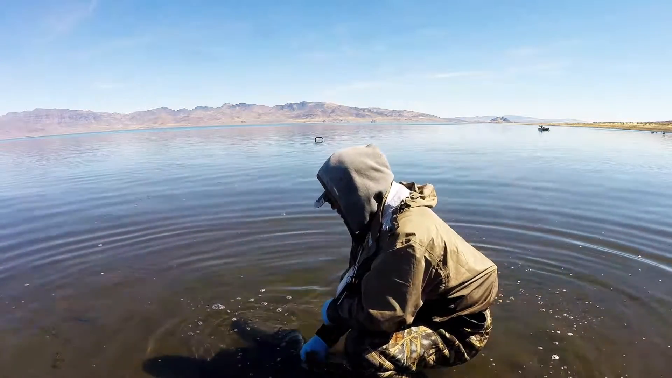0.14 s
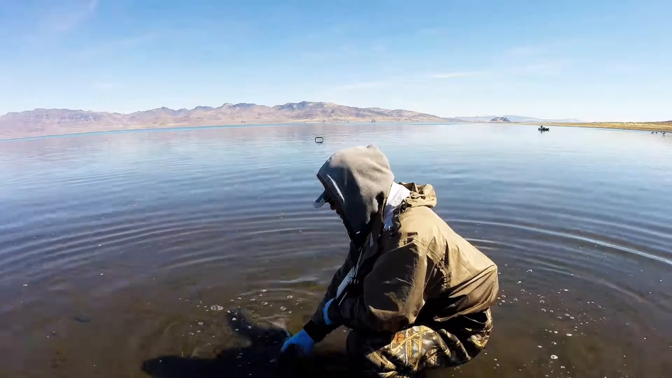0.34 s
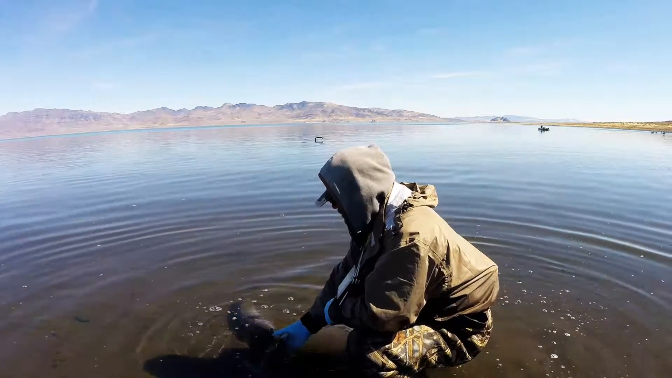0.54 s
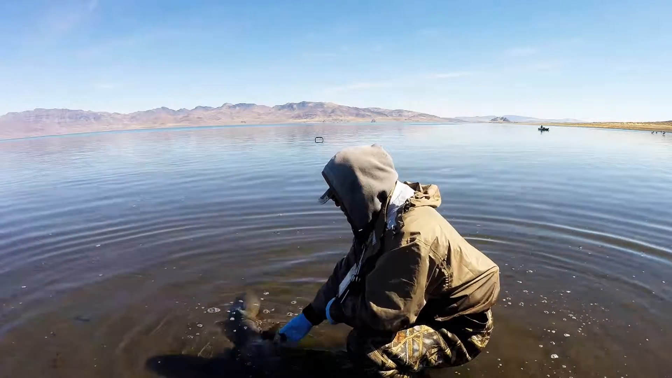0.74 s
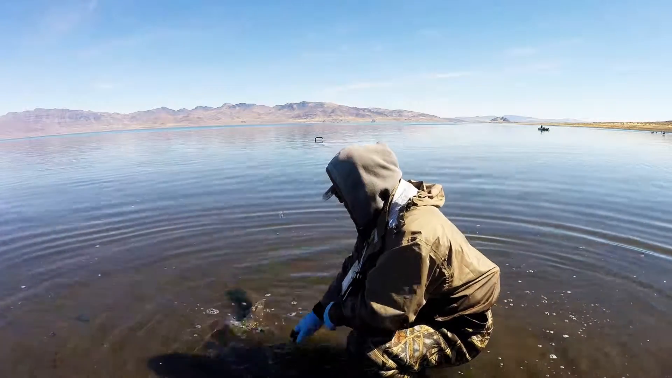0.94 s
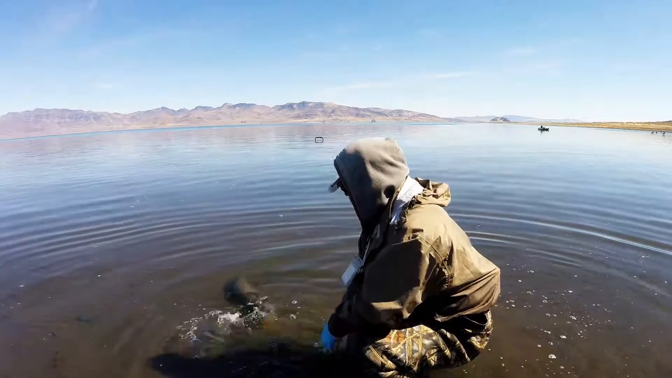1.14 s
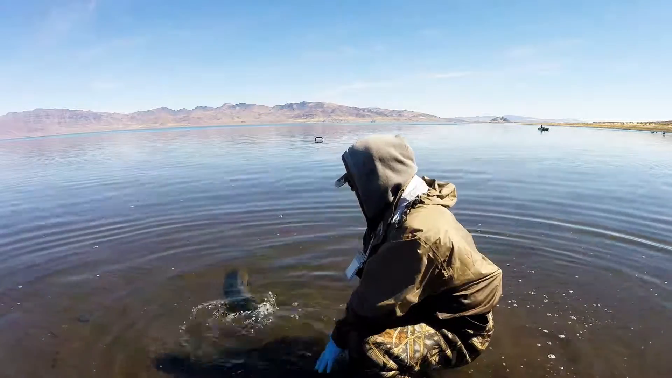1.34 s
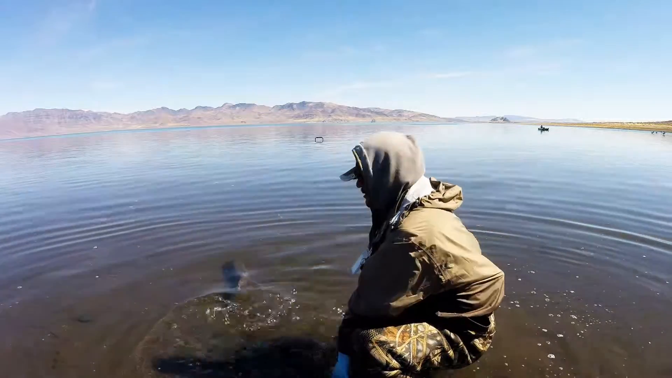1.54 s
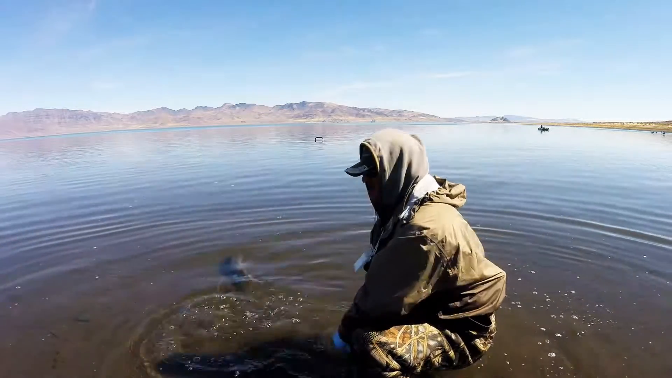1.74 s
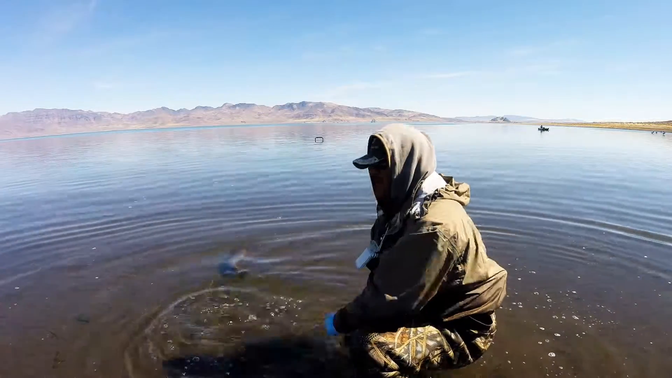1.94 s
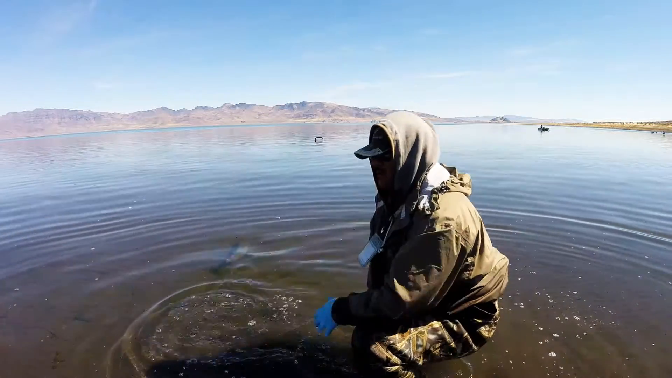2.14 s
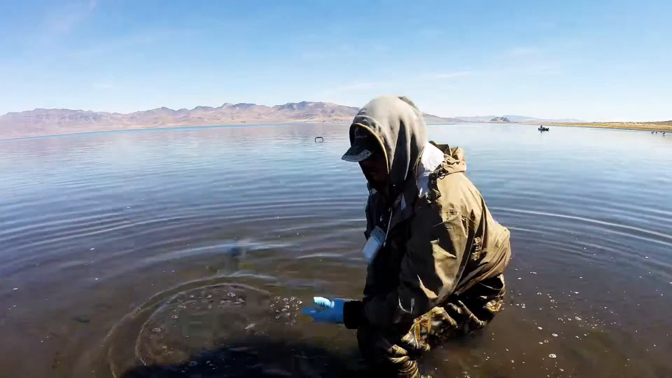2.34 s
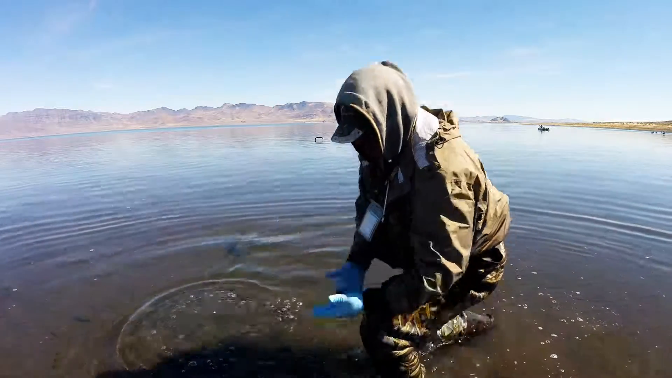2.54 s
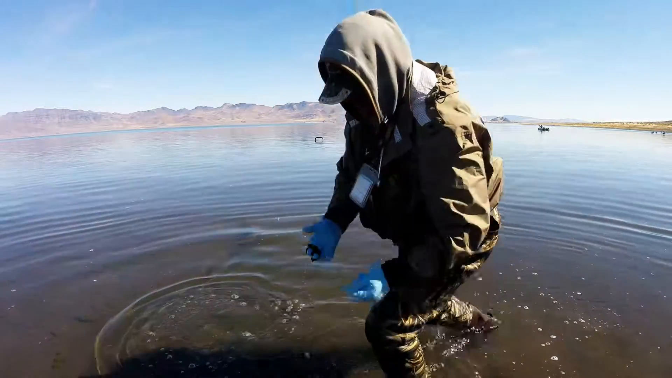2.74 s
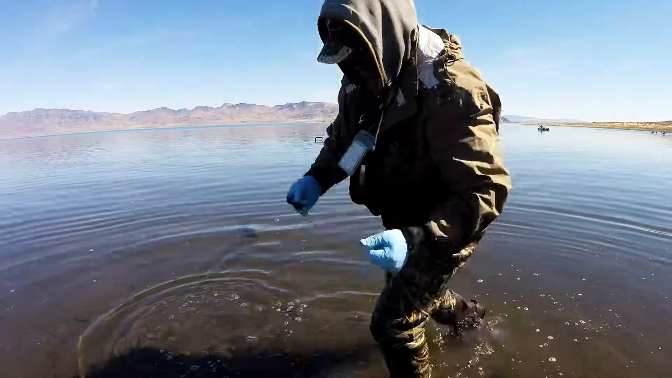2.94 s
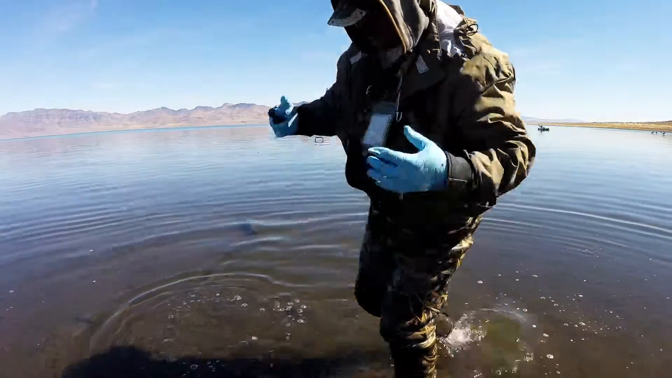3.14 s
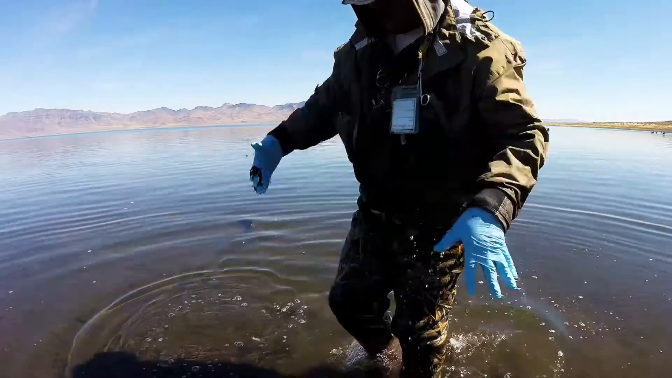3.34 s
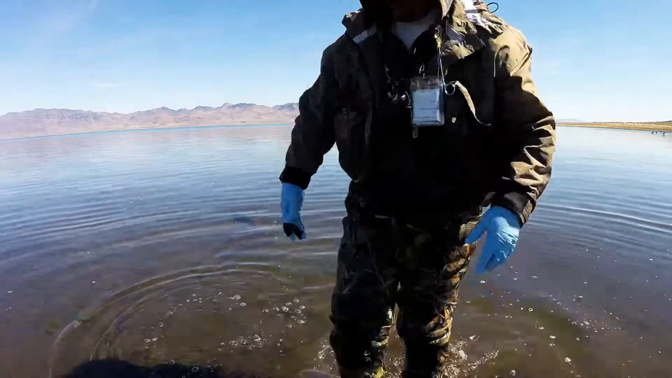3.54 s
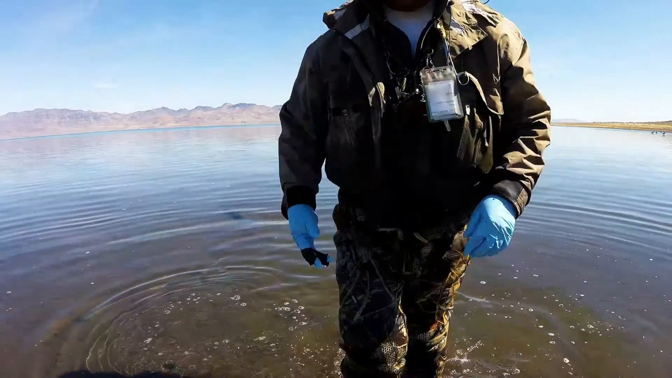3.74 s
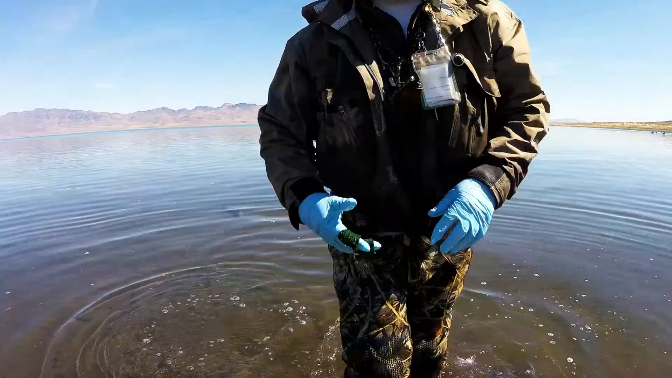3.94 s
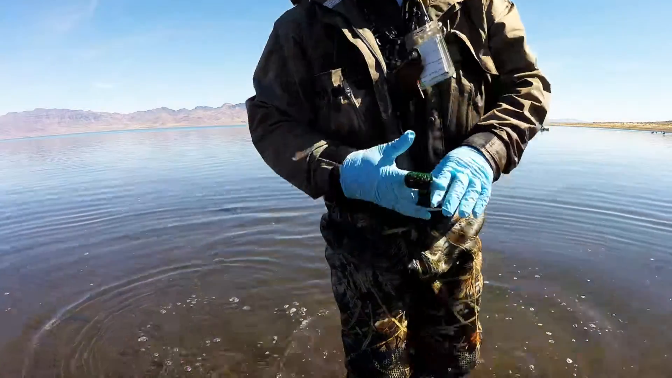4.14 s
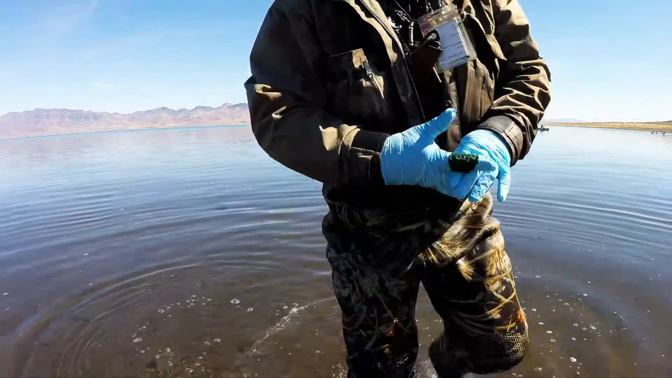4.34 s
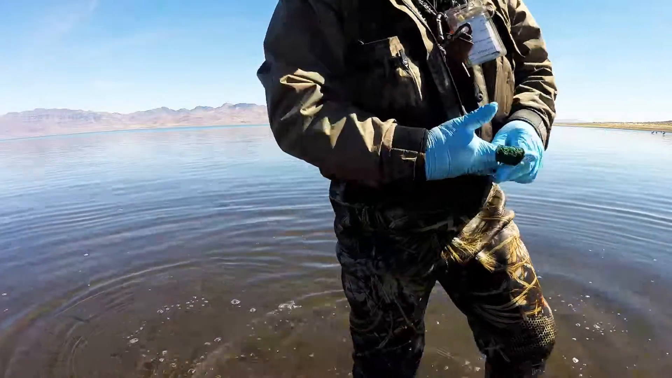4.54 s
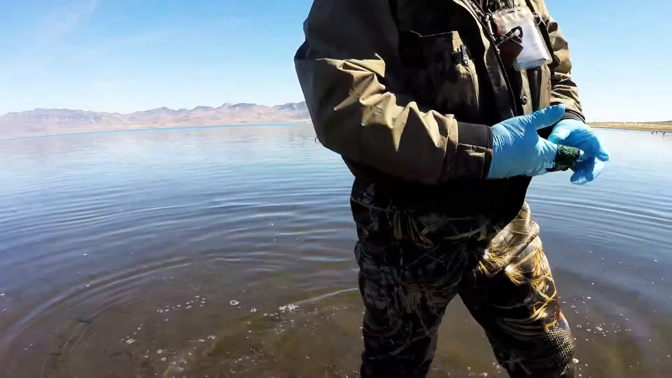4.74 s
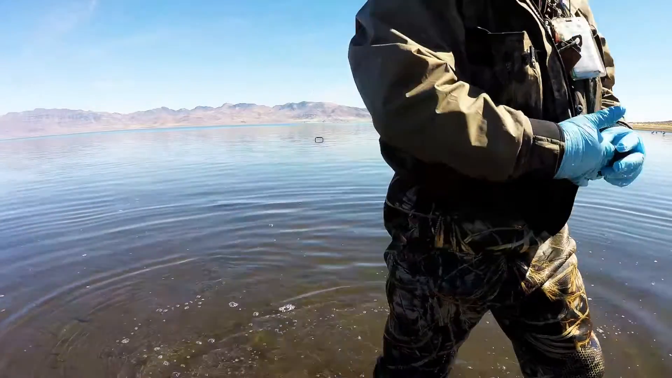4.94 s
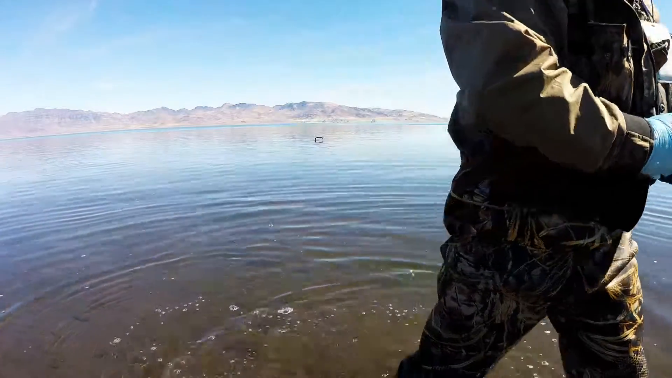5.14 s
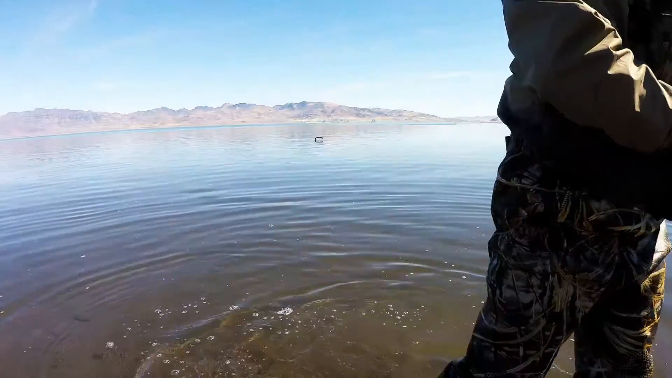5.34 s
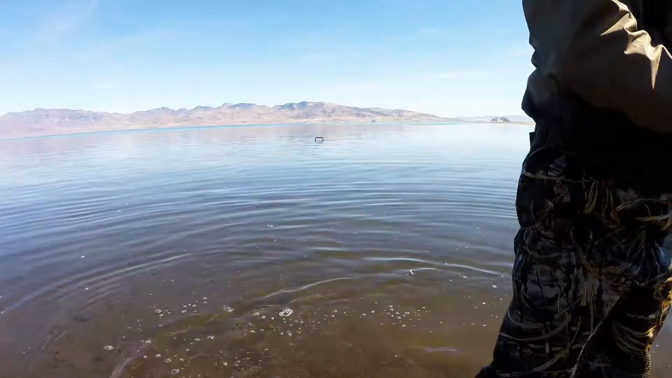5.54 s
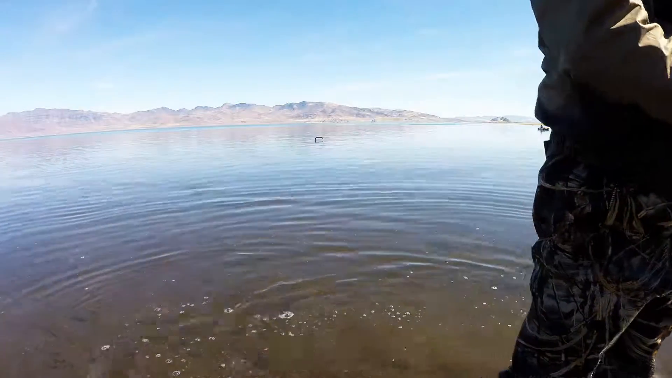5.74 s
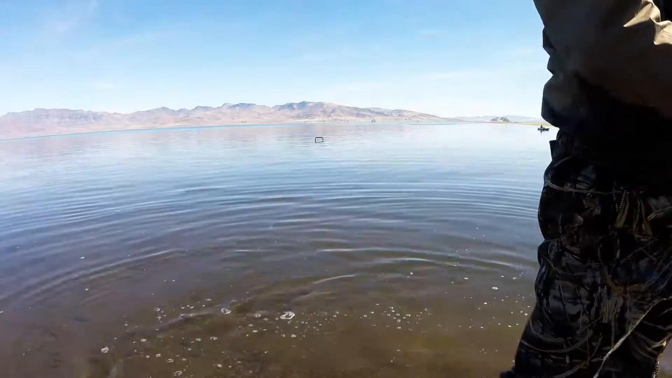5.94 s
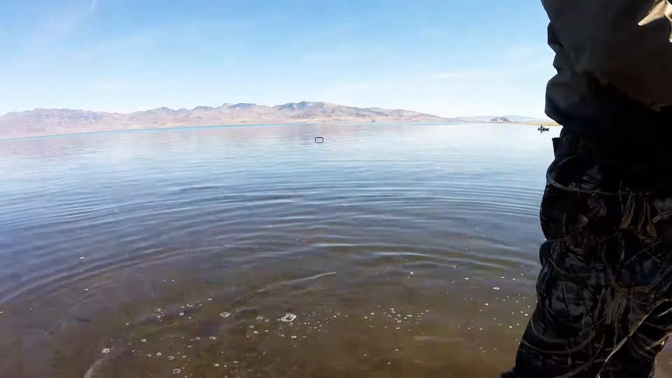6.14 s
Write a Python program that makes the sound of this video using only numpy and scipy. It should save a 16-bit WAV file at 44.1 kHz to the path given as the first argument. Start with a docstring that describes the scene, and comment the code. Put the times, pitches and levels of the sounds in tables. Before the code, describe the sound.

Nearly quiet water and muffled wind puffs open the scene. Around one second a fish's tail bursts into splashes, ringing bubbles and one long hollow gulp. The water settles briefly, then someone wades past the close, nearly mono microphone with wet sloshes, plops and fine spray. The steps weaken, wind and faint hiss drop, and a few soft drips end it.

```python
"""Letting a fish go in a shallow lake

A person in waders lets a fish go and wades past a small camera. The fish kicks off with a splash and a long
"gloop", then legs churn the water. Ringing bubbles (short fading tones), ticks and filtered noise make the
splashes, spray and last drips. Low noise makes the light wind on the microphone, two wavering tones make a far
motor's drone, and steady noise makes a soft hiss. Everything fades out together at the end."""
import sys
import numpy as np
from scipy import signal
from scipy.fft import rfft, irfft, next_fast_len
from scipy.io import wavfile
from scipy.ndimage import uniform_filter1d, map_coordinates

SR = 44100
rng = np.random.default_rng(int(sys.argv[2]) if len(sys.argv) > 2 else 0)


def transcribe(u):
    """Save the signal u as a 16-bit wav file named by the first command-line argument.

    u: samples, shape (n,) or (channels, n), limited to [-1, 1]; the rate is SR.
    q: integer samples, one column per channel.
    """
    v = np.clip(np.atleast_2d(u).T, -1, 1)
    q = np.round(v * 32767).astype(np.int16)
    wavfile.write(sys.argv[1], SR, q)


N = 276983
TIME = np.arange(N) / SR

# Surges of water from the fish's kicks and the wader's legs: crest_s, splash_db, rise_s, settling_s,
# deep_slosh_db and spray_db (both compared with the splash)
SURGES = [(1.06, -51, 0.015, 0.13, 1, -16), (1.163, -42, 0.049, 0.1, -2, -10.5),
          (1.374, -47, 0.056, 0.086, 3, -7.5), (1.76, -46.5, 0.18, 0.19, -2, -8),
          (2.29, -53.5, 0.068, 0.19, 0, -7.5), (2.62, -54.5, 0.049, 0.11, -19, -2.5),
          (3.291, -42, 0.17, 0.13, -1.5, -10.5), (3.47, -44.5, 0.17, 0.55, -4.5, -11),
          (3.738, -40, 0.036, 0.058, -13, -9), (3.98, -46, 0.31, 0.087, 3, -14),
          (4.34, -46.5, 0.16, 0.081, -10, -29), (4.425, -42.5, 0.036, 0.62, -8.5, -10.5),
          (4.64, -44.5, 0.026, 0.12, -4.5, -7.5), (4.88, -51, 0.043, 0.06, 2.5, -6.5),
          (5.22, -52, 0.022, 0.037, -4, -17), (5.41, -58, 0.018, 0.055, 2, -33),
          (5.54, -54, 0.16, 0.048, -5, -10), (5.64, -56, 0.062, 0.016, -4.5, -7),
          (5.82, -59.5, 0.7, 0.077, -1, -8.5)]
# Gentle lapping between the surges: time_s, deep_slosh_db, splash_db, spray_db
LAPPING = [(0, -64, -66, -72.5), (.78, -63, -68, -74.5), (.97, -54.5, -54.5, -64), (2.5, -60, -59, -67),
           (3, -55, -57.5, -62), (4.2, -56, -53, -57.5), (5.3, -65, -65.5, -84), (6.08, -78, -78, -89),
           (6.28, -83, -104, -98)]
# Colour of churned water: frequency_hz, relative_level_db (per Hz)
WATER_COLOUR = [(120, -25), (170, 4.5), (250, 2), (370, 1), (490, 0), (630, 1.5), (780, -1), (1050, -0.5),
                (1500, -3), (2500, -6.5), (4000, -15), (5100, -11), (6600, -19), (10500, -24), (12000, -38),
                (15000, -39)]
# The loudest single bubbles and drips: start_s, pitch_hz, peak_db
SINGLE_BUBBLES = [(0.377, 1180, -42.5), (0.526, 5570, -50), (0.8417, 4740, -44), (0.9403, 4800, -42),
                  (0.964, 2560, -37.5), (0.971, 5380, -37.5), (0.991, 1490, -35), (0.993, 1900, -37.5),
                  (1.0396, 1180, -30), (1.057, 716, -31.5), (1.058, 1760, -30.5), (1.064, 1100, -26.5),
                  (1.09, 746, -35), (1.117, 590, -39), (1.117, 990, -36), (1.1282, 1320, -32.5),
                  (1.138, 570, -30), (1.148, 1010, -37), (1.161, 422, -35), (1.161, 1200, -39),
                  (1.164, 1780, -32.5), (1.205, 1330, -32), (1.2112, 3400, -32), (1.211, 1070, -32),
                  (1.211, 1450, -32), (1.235, 1670, -40), (1.257, 2120, -39), (1.3611, 722, -23),
                  (1.363, 4440, -33), (1.3707, 4640, -34), (1.383, 2056, -29.5), (1.413, 1900, -38),
                  (1.414, 1170, -34.5), (1.421, 950, -40), (1.54, 1180, -39.5), (1.614, 1500, -36.5),
                  (1.656, 1600, -40), (1.667, 790, -38), (1.6937, 5870, -34.5), (1.717, 890, -38.5),
                  (1.726, 780, -36), (1.7291, 2850, -29.5), (1.732, 1980, -29.5), (1.764, 1750, -40),
                  (1.776, 820, -39), (1.8, 2150, -38.5), (1.815, 895, -38.5), (1.8498, 1710, -34),
                  (1.871, 4840, -35.5), (2.305, 1200, -34.5), (2.6478, 2460, -36), (3.001, 2000, -41),
                  (3.077, 1690, -38.5), (3.119, 2430, -38), (3.1368, 2150, -34.5), (3.155, 1530, -39),
                  (3.175, 2080, -36.5), (3.195, 2200, -37), (3.215, 1850, -37), (3.258, 1120, -38),
                  (3.279, 1010, -36), (3.28, 545, -37), (3.285, 2080, -34.5), (3.2874, 1220, -29),
                  (3.29, 960, -35), (3.3061, 1080, -33), (3.314, 1110, -36), (3.325, 2250, -36.5),
                  (3.336, 1620, -38.5), (3.339, 4800, -28), (3.438, 1520, -37), (3.482, 1320, -36.5),
                  (3.718, 7700, -32), (3.737, 1510, -33), (3.771, 890, -34.5), (3.776, 1850, -36),
                  (3.777, 585, -36.5), (3.7904, 5100, -25), (3.856, 1780, -38), (3.865, 2440, -36),
                  (3.902, 1700, -34.5), (3.925, 1230, -40), (3.966, 970, -39), (3.989, 1690, -35),
                  (4.1194, 7550, -39.5), (4.3142, 1367, -23.5), (4.354, 483, -36.5), (4.3556, 1600, -28),
                  (4.3982, 5000, -31), (4.405, 1460, -36), (4.406, 2130, -29), (4.412, 770, -35),
                  (4.425, 1770, -33.5), (4.426, 970, -36.5), (4.439, 1670, -34), (4.44, 3190, -31.5),
                  (4.4536, 1084, -29), (4.4544, 4240, -32.5), (4.484, 930, -33), (4.485, 1120, -32.5),
                  (4.567, 2800, -34), (4.6264, 5270, -30), (4.632, 1960, -37), (4.6484, 455, -36.5),
                  (4.677, 1730, -38), (4.751, 2030, -37), (4.773, 1420, -31.5), (4.887, 444, -38),
                  (5.186, 1830, -47), (5.206, 820, -46), (5.214, 681, -46), (5.226, 936, -50),
                  (5.24, 2890, -44.5), (5.259, 2280, -41), (5.368, 2090, -49), (5.395, 1250, -41),
                  (5.421, 2977, -42.5), (5.441, 1080, -41), (5.473, 905, -47), (5.4951, 5200, -37.5),
                  (5.51, 1500, -42.5), (5.537, 1040, -40.5), (5.641, 2700, -43), (5.666, 1920, -42),
                  (5.669, 1440, -47.5), (5.733, 2780, -29.5), (5.773, 2580, -40), (5.797, 600, -50.5),
                  (5.848, 740, -44), (5.856, 1100, -48), (6.07, 1290, -55)]
# Slaps of water on water: start_s, peak_db (before the final softening), band_hz, decay_s
SLAPS = [(0.455, -45, 3800, 0.0011), (0.666, -47, 4400, 0.0021), (1.161, -29, 5030, 0.0024),
         (1.162, -30.5, 1580, 0.0085), (1.203, -33, 2500, 0.0044), (1.382, -29.5, 2840, 0.0021),
         (1.384, -21, 3260, 0.0014), (1.667, -40, 2500, 0.0017), (1.729, -30, 2840, 0.0019),
         (1.87, -29.5, 5960, 0.0034), (2.013, -31, 1200, 0.0012), (2.081, -36, 7140, 0.0052),
         (2.1138, -28, 2480, 0.00047), (2.625, -25, 3860, 0.00074), (3.34, -30, 6460, 0.0017),
         (3.468, -33.5, 5500, 0.0022), (3.732, -35.5, 1800, 0.0084), (4.02, -31.5, 3750, 0.004),
         (4.646, -35.5, 2200, 0.0043), (4.875, -34.5, 2200, 0.0037), (4.97, -28.5, 2850, 0.003),
         (5.551, -41.5, 2480, 0.0012), (5.654, -38, 6000, 0.001), (5.7064, -35.5, 2560, 0.00045)]
# Gulps of air pockets behind the fish's tail and the legs:
# start_s, length_s, first_pitch_hz, last_pitch_hz, first_peak_db, last_peak_db, raggedness (0 to 1)
GULPS = [(0.988, 0.01, 845, 1160, -44, -44, 0), (1.179, 0.024, 650, 704, -43, -39, 0.4),
         (3.023, 0.018, 774, 1125, -48, -37, 0.1), (3.195, 0.019, 588, 1260, -39.5, -37, .05),
         (3.567, 0.024, 1097, 1750, -50, -39, 0.13), (3.551, 0.018, 1680, 1160, -46, -49.5, 0.4),
         (3.586, 0.04, 395, 392, -41, -49, 0), (3.627, 0.037, 823, 480, -42, -46, .6),
         (3.72, 0.033, 566, 970, -35.5, -37, .35), (3.93, .022, 407, 596, -38, -37, .7),
         (4.496, 0.0326, 503, 722, -47, -35.5, 0.2), (5.164, 0.036, 760, 595, -51, -52.5, 0.2),
         (5.218, 0.099, 338, 305, -46.5, -60, 0.06), (5.244, 0.027, 465, 538, -55, -50, 0),
         (5.332, 0.062, 404, 560, -56, -54, .25), (5.377, 0.038, 681, 930, -58, -48, .4)]
# The wide air cavity behind the fish: length_s, deep_pitch_hz, last_pitch_hz, opening_db, held_db, closing_db
CAVITY = (0.172, 301, 910, -27.5, -45.5, -40.5)
# The breeze on the microphone: time_s, level_db
BREEZE = [(0, -31), (.46, -41.5), (.62, -34.5), (1.2, -35.5), (2.2, -38.5), (2.55, -34.5), (2.87, -38),
          (3.15, -32.5), (3.65, -40), (5.04, -37.5), (5.18, -45), (5.55, -42), (5.82, -58.5), (6.28, -63)]
# Gusts on top of the breeze: peak_s, level_db, spread_s (standard deviation of the bell shape)
GUSTS = [(0.12, -29.5, 0.11), (0.338, -29, 0.04), (1.507, -31.5, 0.052), (3.07, -32.5, 0.068),
         (3.42, -26.5, 0.073), (3.799, -27.5, 0.012), (4.433, -34, 0.16), (4.697, -36, 0.036),
         (4.88, -30.5, 0.07), (5.535, -35.5, 0.011)]
# Colour of the wind, also used for the dull push of water: frequency_hz, relative_level_db (per Hz)
RUMBLE_COLOUR = [(8, -12.5), (22, 5), (40, -1), (60, 2), (90, -7), (125, -13.5), (200, -24.5), (350, -37),
                 (700, -54.5)]
# Single puffs of wind: peak_s, peak_db, pitch_hz
PUFFS = [(0.123, -13.5, 63), (0.18, -22.5, 64.6), (1.468, -20.5, 41.7), (1.564, -22.5, 30.2),
         (2.683, -18.5, 26), (3.051, -19.5, 27.3), (3.18, -18.5, 35.5), (3.366, -19, 41.6),
         (3.408, -19.5, 38.3), (3.509, -18.5, 32.5), (3.973, -22.5, 46.3), (4.401, -21.5, 30)]
# An eddy that falls between the two ports and pushes them opposite ways: peak_s, peak_db, pitch_hz
CROSS_EDDY = (2.745, -26, 21)
# Tones of the far motor: pitch_hz, wobble_width_hz, level_db (where the background is loudest)
DRONE = [(67.74, 7.93, -48.5), (84.55, 13.82, -48)]
# Colour of the steady hiss: frequency_hz, relative_level_db (per Hz)
HISS_COLOUR = [(150, 16.5), (500, 6), (1150, 4.5), (1700, 0.5), (2500, -1.5), (3300, -6.5), (4400, -22),
               (5700, -9), (6700, -2.5), (9000, -5.5), (10800, -9), (12200, -15.5), (15000, -19)]
# Level of the hiss, which the drone follows less steeply: time_s, level_db
BACKGROUND_LEVEL = [(0, -53), (.8, -53), (2.9, -52.5), (4.2, -54), (4.9, -59), (5.3, -61.5), (5.7, -67),
                    (6.0, -68), (6.28, -77.5)]
# Gain of the faint left-right difference: frequency_hz, gain_db
WIDTH = [(30, -97), (150, -39.5), (1000, -34), (4000, -25.5), (8000, -21), (13000, -21)]

SWELL_CYCLES = 2.44  # a bubble needs a few cycles to reach its full ring
THINNING = 0.55  # calmer water makes fewer bubbles: their rate goes as this power of the level
RING_CYCLES, RING_GROWTH = 2.1, 0.36  # decay of a 1 kHz bubble in cycles; smaller ones ring for more cycles
RING_SPREAD, CHIRP_MAX = 0.18, 0.0017  # single bubbles differ in ring length and in how fast the pitch rises
SLAP_RISE = 0.22  # a slap builds up over this share of its decay time
CAVITY_START_S, CAVITY_SETTLES_S = 1.205, 0.037  # the second: how fast the opening push dies away
CAVITY_CURVE = 3.2  # pitch and level rise late, as this power of time
# The flutter's level when the wind is at BREEZE_DB, and its change in dB per dB of wind
BREEZE_DB, FLUTTER_DB, FLUTTER_FOLLOWS = -35.5, -42.5, 0.97
EDGE_HZ = 15000  # upper limit of the camera's sound


def amp(db):
    """Turns decibels into gain."""
    return 10 ** (np.asarray(db) / 20)


def evened(x):
    """Scales a signal to an average strength (rms) of 1."""
    return x / np.sqrt(np.mean(x ** 2) + 1e-20)


def read(points, hz):
    """Reads a colour table on a log-frequency axis."""
    table_hz, value = np.transpose(points)
    return np.interp(np.log(hz + 1), np.log(table_hz + 1), value)


def curve(rows):
    """Draws each column of a time table as a curve, sample by sample."""
    s, *columns = np.transpose(rows)
    return [np.interp(TIME, s, column) for column in columns]


def add(mix, s, sound):
    """Mixes a sound in at time s."""
    part = mix[max(round(s * SR), 0):][:len(sound)]
    part += sound[:len(part)]


def noise(points, lo_hz=0, hi_hz=SR):
    """Noise of rms 1 with the given colour between two edges."""
    size = next_fast_len(N)
    hz = np.fft.rfftfreq(size, 1 / SR)
    colour = amp(read(points, hz)) * (hz > lo_hz) * (hz < hi_hz)
    return evened(irfft(rfft(rng.standard_normal(size)) * colour, size)[:N])


def wander(rate_hz):
    """A random curve of rms 1, drawn as straight lines between random points."""
    knots = rng.standard_normal(4096)
    return evened(map_coordinates(knots, [TIME * rate_hz], order=1, mode="wrap"))


def churn():
    """Stirred water: big slow bubbles, a middle splash and fine spray, each with a wash of noise."""
    deep_level, splash_level, spray_level = stirring()

    deep = amp(-4.5) * froth(deep_level, 229.5, 762.0, per_s=520, spread_db=3.5, cycles=3.6, rise=0.0109)
    deep += amp(-9.0) * noise(WATER_COLOUR, 120, 750)
    deep += amp(-3.5) * noise(RUMBLE_COLOUR, 100, 320)  # the dull push of displaced water

    splash = amp(-3.5) * froth(splash_level, 673.0, 2998, per_s=1000, spread_db=2.0, cycles=6.5, rise=0.00911)
    splash += amp(-11) * noise(WATER_COLOUR, 750, 3300)
    # long, gliding gurgles
    splash += amp(-8) * froth(splash_level, 520, 2100, per_s=60, spread_db=2, cycles=12.4, rise=0.011)
    splash += amp(-12.5) * crackle(per_s=200, spread_db=2.5, lo_hz=900, hi_hz=2480)

    spray = amp(-1) * froth(spray_level, 3454, 10850, per_s=1900, spread_db=5.0, cycles=8.6, rise=0.003)
    spray += amp(-5.5) * noise(WATER_COLOUR, 3300)
    spray += amp(-6) * crackle(per_s=220, spread_db=4.5, lo_hz=3400, hi_hz=6040)

    clumps_db = 2.31 * wander(55) - 1.0  # splash and spray come in clumps
    return deep * deep_level + (splash * splash_level + spray * spray_level) * amp(clumps_db)


def stirring():
    """Levels of deep slosh, splash and spray: the surges add their power to the lapping."""
    power = amp(curve(LAPPING)) ** 2
    for s, db, rise_s, fall_s, deep_db, spray_db in SURGES:
        balance = amp([deep_db, 0, spray_db])
        power += np.outer(balance, amp(db) * swell(s, rise_s, fall_s)) ** 2
    return np.sqrt(power)


def swell(s, rise_s, fall_s):
    """A level that builds up to a crest at time s and settles again."""
    return np.exp(np.minimum((TIME - s) / rise_s, (s - TIME) / fall_s))


def froth(level, lo_hz, hi_hz, per_s, spread_db, cycles, rise, count=28):
    """A cloud of bubbles of many sizes, dense in a surge and sparse in calm water, a few much louder; rms 1."""
    out = np.zeros(N)
    busy = (level / level.max()) ** THINNING
    for hz in np.geomspace(lo_hz, hi_hz, count):
        chance = rng.random(N)
        loudness = np.minimum(rng.exponential(1, N), 3)
        births = np.flatnonzero(chance < busy * per_s / count / SR)
        pop = bubble(hz, cycles * rng.uniform(0.5, 1.5), rise)
        pop *= amp(read(WATER_COLOUR, hz)) * np.sqrt(hz) / np.linalg.norm(pop)
        for k in births:
            # Dividing by the root of busy offsets the thinning; the sign flips on every odd sample
            gain = amp(spread_db * loudness[k]) / np.sqrt(busy[k]) * (-1) ** k
            add(out, k / SR, pop * gain)
    return evened(out)


def bubble(hz, cycles, rise):
    """A bubble swells and rings out, its pitch rising as it nears the surface."""
    u = np.arange(int(SR * (5 * cycles + 6) / hz)) * hz / SR  # time counted in cycles
    ring = (1 - np.exp(-(u / SWELL_CYCLES) ** 2)) * np.exp(-u / cycles)
    return ring / ring.max() * np.sin(2 * np.pi * u * (1 + rise * u))


def crackle(per_s, spread_db, lo_hz, hi_hz):
    """Droplets patter back onto the surface as tiny dry ticks; rms 1."""
    loudness = np.minimum(rng.exponential(1, N), 3)
    ticks = (rng.random(N) < per_s / SR) * amp(spread_db * loudness) * np.sign(rng.standard_normal(N))
    ticks = signal.lfilter(*signal.butter(2, lo_hz, "high", fs=SR), ticks)
    return evened(signal.lfilter(*signal.butter(2, min(hi_hz, SR / 3), fs=SR), ticks))


def plops():
    """The large bubbles and drips that stand out one by one, each with a ring and a chirp of its own."""
    out = np.zeros(N)
    for s, hz, db in SINGLE_BUBBLES:
        ring, chirp = rng.random(2)
        cycles = RING_CYCLES * (hz / 1000) ** RING_GROWTH * np.exp(RING_SPREAD * (2 * ring - 1))
        add(out, s, amp(db) * bubble(hz, cycles, CHIRP_MAX * chirp))
    return out


def slaps():
    """Water hits water: a sharp, broad burst of noise that dies in milliseconds."""
    out = np.zeros(N)
    t = np.arange(4096) / SR
    for s, db, hz, decay in SLAPS:
        band = signal.butter(1, [hz / 2.2, min(hz * 1.48, 0.45 * SR)], "band", fs=SR)
        contact = (1 - np.exp(-t / (SLAP_RISE * decay))) * np.exp(-t / decay)
        burst = rng.standard_normal(len(t)) * contact
        burst = signal.lfilter(*band, signal.lfilter(*band, burst))
        add(out, s, amp(db) * burst / abs(burst).max())
    return signal.sosfilt(signal.butter(3, 10500, fs=SR, output="sos"), out)  # softens the top


def gulps():
    """An air pocket rings as long as water feeds it; its pitch moves ever faster as it closes or opens."""
    out = np.zeros(N)
    for s, length, from_hz, to_hz, from_db, to_db, ragged in GULPS:
        t = np.arange(int((length + 0.015) * SR)) / SR
        done = np.minimum(t / length, 1)
        hz = from_hz * (to_hz / from_hz) ** (done ** 1.6)
        level = amp(from_db + (to_db - from_db) * done)
        edges = (1 - np.exp(-t / 0.00083)) * np.exp(-np.maximum(t - length, 0) / 0.0032)
        add(out, s, edges * level * gurgle(hz, ragged))
    return out


def cavity(s, length, deep_hz, last_hz, open_db, held_db, close_db):
    """A wide cavity opens with a push, holds one deep, trembling note, then glides up as it closes."""
    out = np.zeros(N)
    t = np.arange(int((length + 0.015) * SR)) / SR
    closed = np.minimum(t / length, 1) ** CAVITY_CURVE
    hz = deep_hz * (last_hz / deep_hz) ** closed
    db = held_db + (open_db - held_db) * np.exp(-t / CAVITY_SETTLES_S) + (close_db - held_db) * closed
    edges = (1 - np.exp(-t / 0.003)) * np.exp(-np.maximum(t - length, 0) / 0.0043)
    add(out, s, edges * amp(db) * gurgle(hz, ragged=0.1))
    return out


def gurgle(hz, ragged, shakes_per_cycle=0.407):
    """The note of an air pocket along a pitch curve; turbulence breaks up a share of it."""
    turns = np.cumsum(hz) / SR
    ragged = np.clip(ragged, 0, 1)
    a, b = (evened(map_coordinates(knots, [turns * shakes_per_cycle], order=2, mode="wrap"))
            for knots in rng.standard_normal((2, 256)))
    # The steady share plus a share whose strength and phase shake at random
    shaken = np.sqrt(1 - ragged) + np.sqrt(ragged / 2) * (a + 1j * b)
    return (shaken * np.exp(2j * np.pi * turns)).imag


def scatter(x, t60, size=4096):
    """Faint, quick reflections from the water surface and the wader's body, falling 60 dB in t60 seconds."""
    t = np.arange(size) / SR
    taps = rng.standard_normal(size) * (rng.random(size) < 2000 / SR) * amp(-60 * t / t60) * (t > 0.001)
    return signal.oaconvolve(x, taps / np.linalg.norm(taps))[:N]


def wind():
    """Wind on the microphone: deep buffeting, and a quicker, higher flutter that rises and falls with it."""
    breeze_db, = curve(BREEZE)
    force = np.sqrt(amp(breeze_db) ** 2 + sum(gust(*row) ** 2 for row in GUSTS))
    buffeting = force * steadied(noise(RUMBLE_COLOUR, 8.9, 66), size=5000)
    flutter_level = amp(FLUTTER_DB) * (force / amp(BREEZE_DB)) ** FLUTTER_FOLLOWS
    return buffeting + flutter_level * steadied(noise(RUMBLE_COLOUR, 66, 1500), size=4000)


def gust(s, db, spread_s):
    """A bell-shaped swell of wind."""
    return amp(db) * np.exp(-((TIME - s) / spread_s) ** 2 / 2)


def steadied(x, size):
    """Takes the slow swells out of a low noise."""
    return x / np.sqrt(uniform_filter1d(x ** 2, size) + 1e-6)


def puffs(rows):
    """Each single eddy pushes the diaphragm once, with a smaller swing back on either side."""
    out = np.zeros(N)
    for s, db, hz in rows:
        u = np.arange(-SR // 10, SR // 10) * hz / SR  # cycles before and after the peak
        add(out, s - 1 / 10, amp(db) * np.cos(2 * np.pi * u) * np.exp(-(u / 0.5) ** 2))
    return out


def background():
    """Soft hiss from coloured noise, and a far motor's drone from tones that waver in pitch."""
    level_db, = curve(BACKGROUND_LEVEL)
    drone = np.zeros(N)
    for hz, width, db in DRONE:
        turns = np.cumsum(hz + width / 2 * wander(15)) / SR
        drone += amp(db) * np.sqrt(2) * np.sin(2 * np.pi * turns)
    return amp(level_db) * noise(HISS_COLOUR) + drone * amp(0.62 * (level_db - level_db.max()))


def scene():
    """All sources reach two microphone ports that lie close together: nearly mono."""
    water = churn() + plops() + slaps() + gulps() + cavity(CAVITY_START_S, *CAVITY)
    mid = water + amp(-10.5) * scatter(water, t60=0.038) + wind() + puffs(PUFFS) + background()
    spread = scatter(water, t60=0.023) + wind() + background()  # becomes a faint stereo spread
    size = next_fast_len(N)
    width_gain = amp(read(WIDTH, np.fft.rfftfreq(size, 1 / SR)))
    side = irfft(rfft(spread, size) * width_gain, size)[:N]
    side += puffs([CROSS_EDDY])
    return np.array([mid + side, mid - side])


def record(dry):
    """The camera's band limit removes the highest treble, after a soft start of 4 ms."""
    eased = dry * np.minimum(TIME / 0.004, 1)
    lowpass = signal.firwin(511, EDGE_HZ, window=("kaiser", 9), fs=SR)
    return signal.oaconvolve(eased, lowpass[None], "same")


dry = scene()
out = record(dry)
transcribe(out)
```